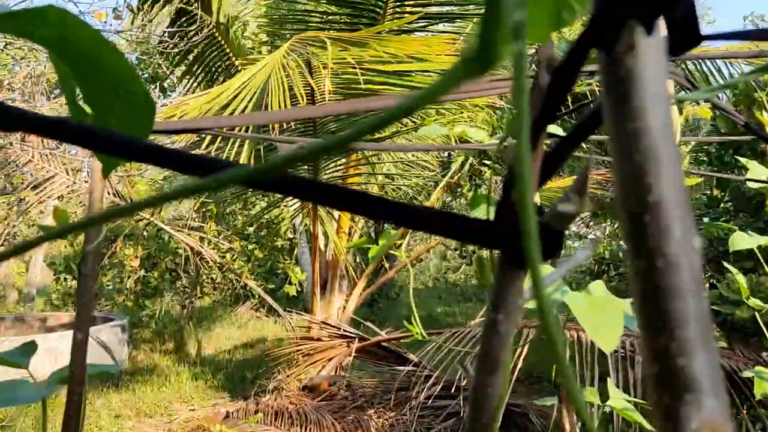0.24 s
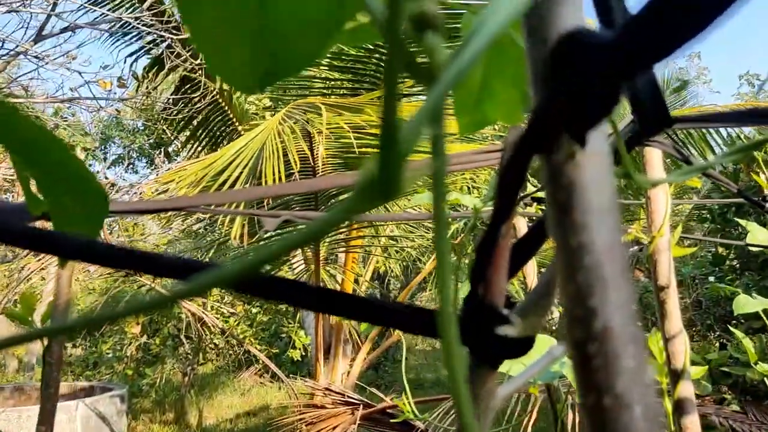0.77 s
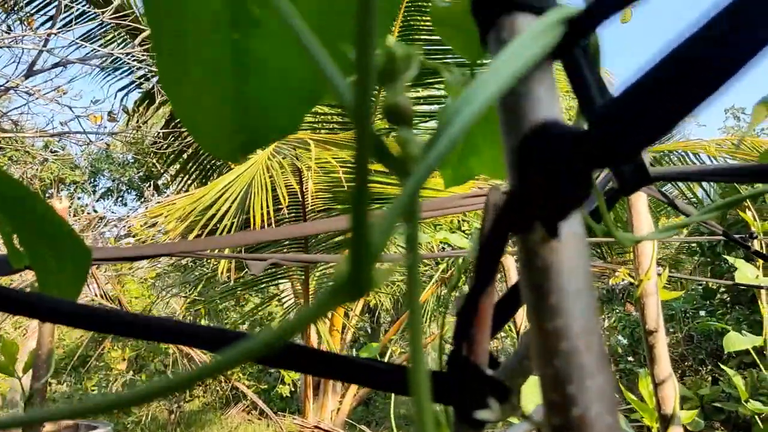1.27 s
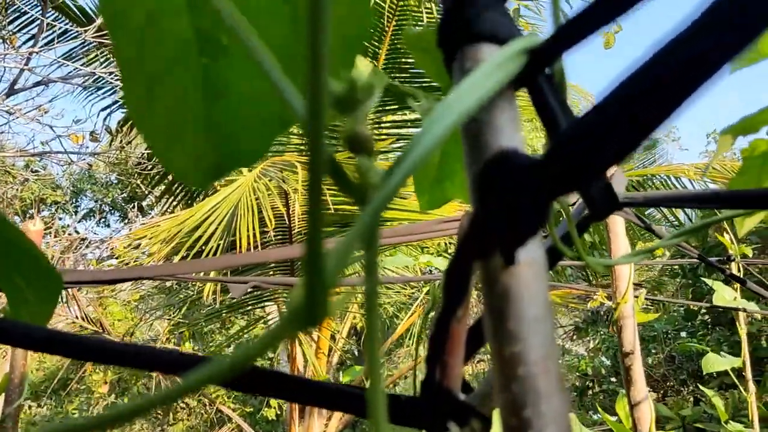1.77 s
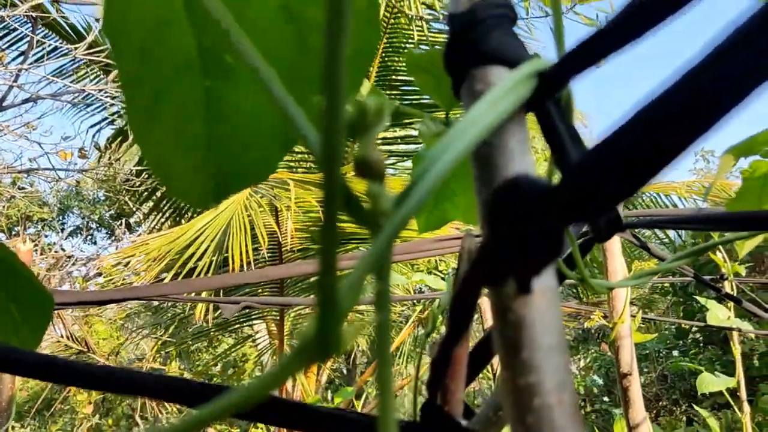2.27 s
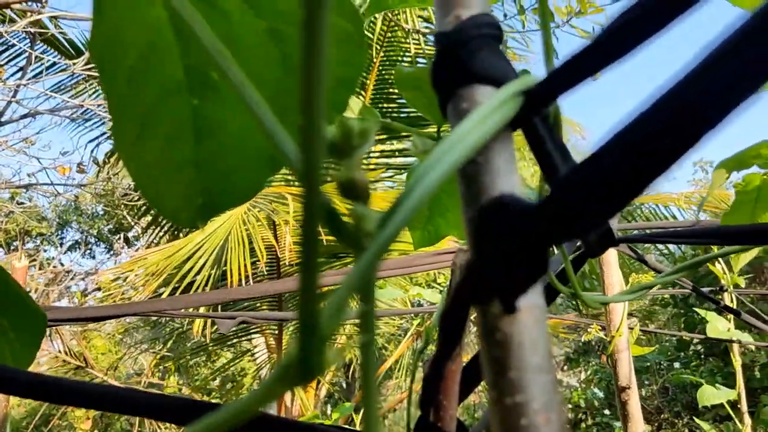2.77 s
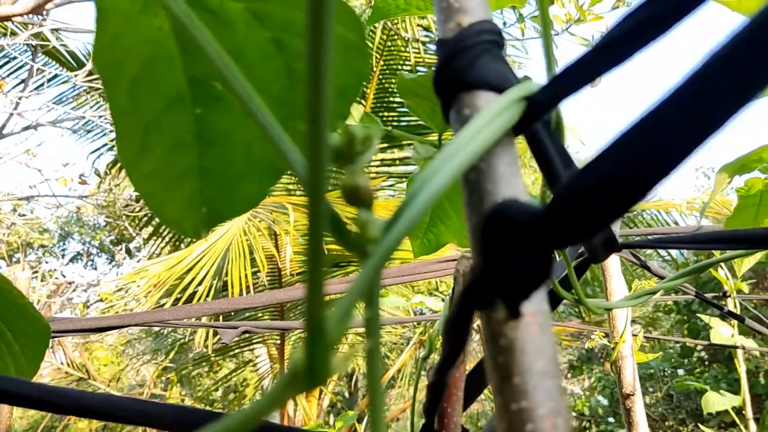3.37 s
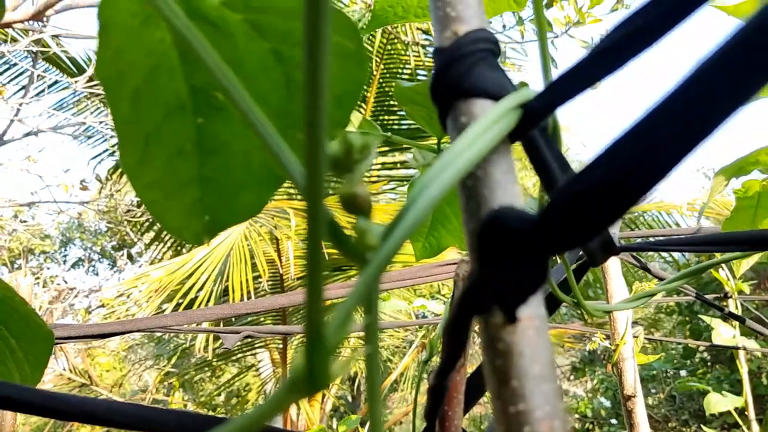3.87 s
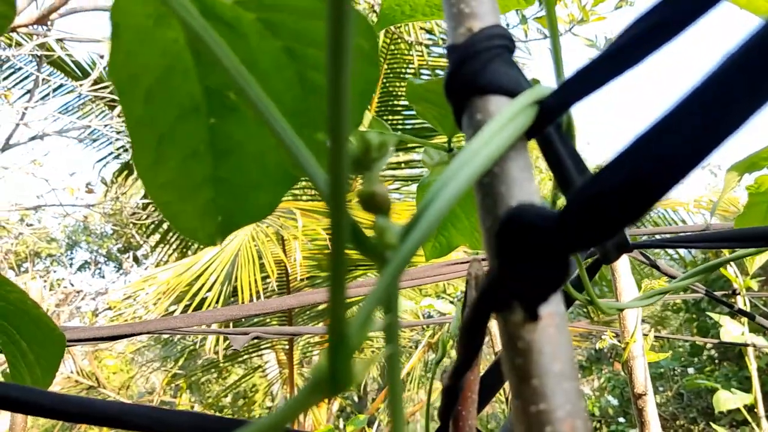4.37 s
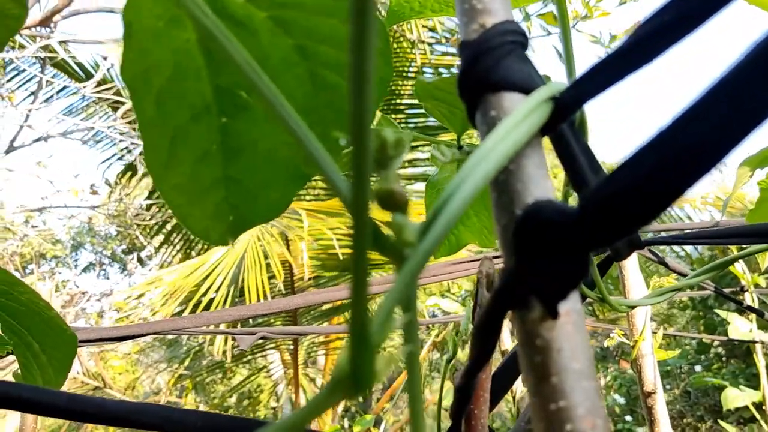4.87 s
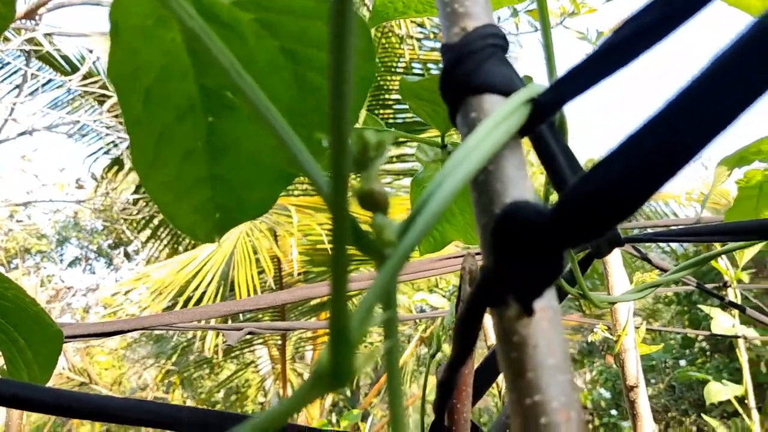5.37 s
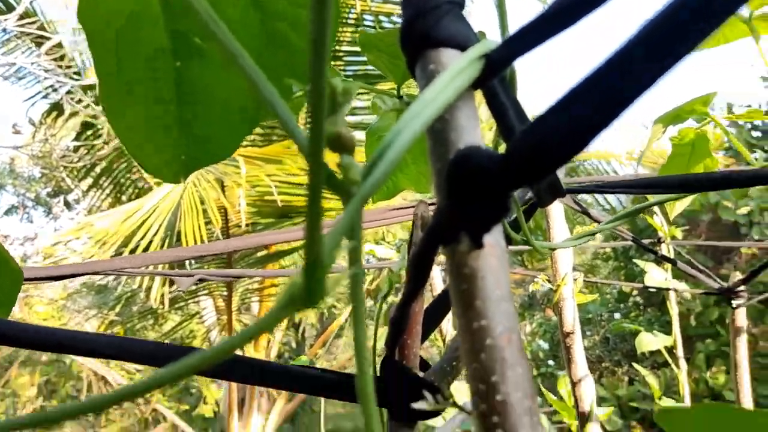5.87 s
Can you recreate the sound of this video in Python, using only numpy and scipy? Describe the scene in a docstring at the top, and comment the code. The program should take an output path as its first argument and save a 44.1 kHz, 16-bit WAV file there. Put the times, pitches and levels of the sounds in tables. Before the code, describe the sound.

A shrill cicada drone, strongest on the right, runs throughout in a tropical garden, with two crickets chirping rapidly out of step. A leaf brushes the microphone at the start, and one sharp tick comes on the left before halfway. Birds whistle and rasp softly, then cluck more busily near the end. Underneath, a breeze rumbles on the hand-held microphone and a faint, far engine throbs and fades.

```python
"""A shrill cicada drone, strongest on the right, fills a tropical garden by day; the phone is hand-held.
Two kinds of cicada, high and low, buckle their tymbals and ring their abdomens, while two crickets
stroke their wings out of step. Birds cluck, whistle and rasp nearby; a far one repeats a phrase.
Far off, a slow engine throbs and draws away over the hum of the place. Right at the microphone,
a breeze rumbles on the two ports, a leaf brushes by and there is one sharp tick."""
import sys
import numpy as np
from scipy import signal
from scipy.io import wavfile
from scipy.ndimage import uniform_filter1d

SR = 44100
rng = np.random.default_rng(int(sys.argv[2]) if len(sys.argv) > 2 else 0)


def to_wav(s):
    """Save 16-bit WAV."""
    ch = np.atleast_2d(s).T  # columns
    pcm = np.round(np.clip(ch, -1, 1) * 32767)  # PCM
    wavfile.write(sys.argv[1], SR, pcm.astype(np.int16))


N = 270171
T = np.arange(N) / SR
PORT_LAG = int(.00042 * SR)  # samples by which sound from the right is late at the left port

# Distant hum of the garden. Each row: frequency in Hz, relative spectral density in dB.
HUM_SPECTRUM = [(35, -35), (60, 1.5), (92, -9), (129, -11), (360, -19), (680, -17.5), (1170, -25.5),
                (1930, -22), (2560, -27.5), (3600, -25.5), (5200, -30), (6760, -54), (11400, -120)]
# Far engine drawing away. Each row: time in seconds, firing rate in Hz, level in dB.
ENGINE_RUN = [(0, 18.1, -41.5), (0.702, 19.6, -44), (2.1, 20.6, -45), (3.4, 21.1, -52), (4.2, 21, -52),
              (6.13, 20.5, -56)]
# Resonances of its exhaust. Each row: centre in Hz, width in Hz, relative gain in dB.
EXHAUST_MODES = [(95.1, 32.3, 8.5), (85.5, 11, 6.5), (143.7, 27, -1)]
# Far whine, sinking twice. Each row: start and length in seconds, first and last pitch in Hz, level in dB.
WHINE_GLIDES = [(1.82, .66, 975, 805, -60), (2.46, .62, 890, 730, -60.5)]
# The far bird's phrase. Each row: delay and length of a note in seconds, its first, middle and last
# pitch in Hz, dB above the phrase's level.
PHRASE_NOTES = [(0, 0.035, 3250, 4150, 4770, 13.5), (0, .035, 3800, 3900, 3700, 13.5),
                (0.044, 0.0305, 3700, 3900, 3550, 3.5), (0.072, 0.017, 4800, 4300, 5000, 13.5),
                (.07, 0.044, 3800, 3700, 3900, 11), (.065, 0.018, 3500, 3100, 3450, 5)]
# Repeats of that phrase. Each row: start in seconds, level in dB.
PHRASE_REPEATS = [(.745, -62.5), (1.066, -63), (1.39, -61), (1.72, -61.5), (2.049, -61), (2.368, -64),
                  (2.712, -60), (3.045, -58.5), (3.36, -66.5), (3.645, -63), (3.96, -65), (5.45, -62.5),
                  (6.04, -62)]
# Near whistles and faint low hoots. Each row: start and length in seconds, first and last pitch in Hz,
# level in dB.
BIRD_WHISTLES = [(0.369, 0.075, 2433, 1744, -44), (1.125, 0.021, 5900, 4630, -44),
                 (1.774, .012, 5070, 4470, -48), (2.144, 0.089, 2100, 1820, -57),
                 (2.476, 0.034, 2100, 1840, -54), (2.76, 0.047, 2100, 1880, -56),
                 (2.954, 0.1, 2200, 2570, -57), (3.083, 0.056, 2085, 1880, -59),
                 (3.414, 0.052, 2085, 1890, -54), (3.68, 0.081, 2100, 1846, -53),
                 (5.622, .045, 3120, 3100, -38.5), (5.9, 0.046, 2900, 3130, -40),
                 (5.94, 0.023, 3150, 3140, -34)]
BIRD_HOOTS = [(5.834, 0.083, 585, 626, -51.5), (5.939, 0.073, 762, 760, -48), (5.979, 0.062, 226, 225, -47),
              (6.091, 0.037, 250, 290, -45)]
# Near clucks. Each row: start and length in seconds, top pitch in Hz, level in dB.
BIRD_CLUCKS = [(4.208, 0.036, 2010, -46.5), (5.447, 0.025, 2012, -42.5), (5.463, 0.021, 1920, -42),
               (5.445, 0.037, 2500, -45), (5.588, 0.019, 1827, -35.5), (5.61, 0.018, 1880, -48),
               (5.665, 0.042, 1990, -34.5), (5.7, 0.03, 2350, -47), (5.674, 0.03, 2500, -41),
               (5.708, 0.034, 2020, -55), (5.785, 0.02, 1776, -35.5), (5.788, 0.0364, 1392, -37),
               (5.819, 0.03, 1790, -48), (5.817, 0.031, 2530, -44), (5.884, 0.026, 1710, -44),
               (6.074, 0.032, 1904, -40), (6.097, 0.03, 2524, -35)]
# Near hoarse calls. Each row: start and length in seconds, throat resonance and width in Hz, level in dB.
BIRD_RASPS = [(0.43, 0.067, 4660, 700, -55.5), (0.688, 0.14, 4870, 600, -55.5),
              (0.985, 0.088, 4830, 400, -52), (1.177, 0.074, 4560, 350, -55),
              (1.282, 0.12, 4540, 800, -54.5), (2.41, 0.074, 3740, 1200, -47.5),
              (5.038, 0.064, 3640, 1000, -49), (5.245, 0.13, 1770, 500, -50),
              (5.445, 0.067, 3700, 500, -46), (5.6, 0.11, 2560, 540, -49.5), (5.616, 0.13, 3030, 298, -47),
              (5.75, 0.11, 3090, 300, -62), (5.72, 0.057, 4480, 700, -54), (6.03, 0.1, 4300, 900, -60),
              (5.89, 0.12, 3020, 394, -44), (6.009, 0.069, 3090, 310, -48)]
# Each cricket's loudness, direct to the right port. Each row: time in seconds, level in dB.
FAR_CRICKET_LEVELS = [(.2, -42), (.9, -42), (1.2, -37.5), (2.2, -36), (3.4, -37.5), (4.6, -36),
                      (5.1, -37.5), (5.8, -37)]
NEAR_CRICKET_LEVELS = [(0, -32.5), (.8, -34.5), (1.5, -35.5), (2.1, -31.5), (2.9, -32), (3.3, -37),
                       (4, -30.5), (4.9, -35), (5.8, -30)]
# Single cicadas. Each row: bursts per second at the start and at the end, throb rate in Hz,
# throb depth from 0 to 1, left and right level in dB.
LOW_CICADAS = [(139, 139, 60, .95, -41, -37), (118, 118, 7, .1, -47, -42)]
HIGH_CICADAS = [(120.1, 120, 3.5, 0, -37, -31.5), (97.4, 91, 13, 0, -58, -34),
                (112, 65, 13, 0.05, -52, -34)]
# Abdomen resonances, one list as heard at the left port, one at the right.
# Each row: centre in Hz, width in Hz, relative gain in dB.
LOW_ABDOMEN = [
    [(6396, 880, 2), (5615, 610, -11), (6120, 280, -2), (11600, 1300, -21.5), (12970, 500, -8.5)],
    [(6427, 940, 4.5), (5660, 310, -13), (13070, 750, -16.5), (13700, 400, -25)],
]
HIGH_ABDOMEN = [
    [(8980, 1430, 2), (10060, 820, 4.5), (11025, 200, -5.5)],
    [(8760, 990, -1), (9348, 640, 0), (9870, 670, -13)],
]
# Swell of the chorus, used about its mean. Each row: time in seconds, high kind in dB, low kind in dB.
CHORUS_SWELL = [(0.0, -34, -45.5), (0.1, -34, -45), (1.17, -34, -47), (2.52, -35, -45.5), (2.87, -34, -46),
                (3.79, -35, -46.5), (3.93, -33.5, -45), (5.972, -34, -46), (6.0, -34, -46)]
# Brief dips of the high drone on the right. Each row: time in seconds, level change in dB.
DRONE_DIPS = [(0.138, -22), (0.86, -9), (1.267, -5), (1.73, -6), (2.035, -15), (2.162, -23), (2.694, -24),
              (3.466, -13.5), (3.66, -10), (3.807, -13), (4.233, -14), (5.513, -8), (5.727, -13)]


def undb(db):
    """Decibels to gain."""
    return 10 ** (np.asarray(db) / 20)


def level(x, db):
    """Scale to an rms level."""
    return x * undb(db) / np.sqrt(np.mean(x ** 2))


def ring(x, hz, width, order=2):
    """A steep resonance: a two-pole band-pass run several times."""
    b, a = signal.iirpeak(hz, hz / width, fs=SR)
    for _ in range(order):
        x = signal.lfilter(b, a, x)
    return x


def walk(rate):
    """A smooth wander: random values held 1 / rate seconds and slewed twice."""
    hold = int(SR / rate)
    steps = np.repeat(rng.standard_normal(N // hold + 1), hold)
    return 2.2 * uniform_filter1d(uniform_filter1d(steps, hold), hold)[:N]


def clicks(rate, jitter_s, scatter_db):
    """One click per cycle, each a little early or late and of its own size."""
    cycles = np.flatnonzero(np.diff(np.floor(np.cumsum(rate) / SR)))
    timing, size = rng.standard_normal((N // 40, 2))[:len(cycles)].T
    onsets = np.clip(cycles + (jitter_s * SR * timing).astype(int), 0, N - 1)
    out = np.zeros(N)
    np.add.at(out, onsets, undb(scatter_db * size))
    return out


def window(start, length, edge):
    """A gate with rounded ends."""
    return np.sin(np.pi / 2 * np.clip(np.minimum(T - start, start + length - T) / edge, 0, 1)) ** 2


def foliage(x, t60, wet_db):
    """Direct sound plus a spray of echoes off leaves and trunks, new each time."""
    t = T[:int(SR * .5)]
    response = level(rng.standard_normal(len(t)) * np.exp(-np.log(1000) * t / t60), wet_db)
    response /= np.sqrt(len(t))
    response[:int(.01 * SR)] = 0  # gap before the first echo
    response[0] = 1
    return signal.fftconvolve(x, response)[:N]


def garden_hum():
    """Distant hum in third-octave bands that each flicker; only the bass is alike at both ports."""
    out = 0
    spectrum_hz, spectrum_db = np.transpose(HUM_SPECTRUM)
    for hz in 60 * 2 ** np.arange(0, 6.5, 1 / 3):
        mid, side = (ring(rng.standard_normal(N), hz, hz / 2.93) for _ in range(2))
        band = mid + min(hz / 300, 1) * side * np.array([[1], [-1]])
        band_db = np.interp(np.log(hz), np.log(spectrum_hz), spectrum_db)
        flicker_db = .5 * walk(4) + 1.5 * min(hz / 3000, 1) * walk(40)
        out = out + undb(band_db + flicker_db) * band
    return level(out, -47.5)


def engine():
    """Far off, slow uneven firings ring an exhaust, smeared by echoes on the long way here."""
    times, firing_hz, db = np.transpose(ENGINE_RUN)
    firings = clicks(np.interp(T, times, firing_hz), jitter_s=.0009, scatter_db=1.8)
    exhaust = sum(undb(gain_db) * ring(firings, hz, width) for hz, width, gain_db in EXHAUST_MODES)
    ports = np.array([foliage(exhaust, t60=.35, wet_db=-8.5) for _ in range(2)])
    return level(ports, 0) * undb(np.interp(T, times, db))


def whine(fade_db_per_s=4):
    """A faint, far tone wavers and fades as it sinks in pitch."""
    waver, flicker_db = 1 + .009 * walk(50), 2 * walk(15)
    out = 0
    for start, length, first_hz, last_hz, db in WHINE_GLIDES:
        hz = np.interp(T, [start, start + length], [first_hz, last_hz]) * waver
        envelope = window(start, length, .08) * undb(db + flicker_db - fade_db_per_s * (T - start))
        out = out + envelope * np.sin(2 * np.pi * np.cumsum(hz) / SR)
    return out


def breeze():
    """Air on the microphone: a separate deep rumble at each port, swelling in the same gusts."""
    air = rng.standard_normal((2, N))
    air = signal.sosfilt(signal.butter(1, [3, 9], "band", fs=SR, output="sos"), air)
    air = signal.sosfilt(signal.butter(2, 70, fs=SR, output="sos"), air)
    return level(air * undb(3.05 * walk(2.7)), -38.5)


def leaf_brush():
    """A leaf brushes by at the start: gritty noise, brighter on the left."""
    grit = rng.standard_normal((2, N)) * undb(1.2 * walk(500))
    body = sum(level(ring(grit, hz, width), db)
               for hz, width, db in [(640, 1300, -46), (1540, 2060, -33.5), (3200, 2000, -44)])
    hiss = level(ring(grit, 9800, 2200), -32) * undb([[0], [-6]])
    top = level(ring(grit, 10600, 1100, order=3), -49)
    return (body + hiss + top) * window(start=.068, length=.11, edge=.05)


def tick(start=2.481, t60=.047):
    """One sharp tick close to the left port: bright noise that dies fast."""
    age = np.maximum(T - start, 0)
    burst = (T >= start) * np.exp(-np.log(1000) * age / t60) * rng.standard_normal(N)
    bright = ring(burst, 11300, 2500) + undb(-12) * ring(burst, 13000, 2500)
    return bright / np.abs(bright).max() * undb([[-13], [-28]])


def bird_notes(notes, breath, wobble, breathiness):
    """Tones that curve through three pitches; the breathier the throat, the worse it holds its pitch."""
    out = np.zeros(N)
    for start, length, *pitches, db in notes:
        span = slice(int(start * SR), int((start + length) * SR))
        hz = np.polyval(np.polyfit([0, .5, 1], pitches, deg=2), (T[span] - start) / length)
        hz *= 1 + .022 * breathiness * wobble[span]
        voice = (1 - breathiness + breathiness * breath[span]) * np.sin(2 * np.pi * np.cumsum(hz) / SR)
        out[span] += undb(db) * np.sqrt(2 * np.hanning(len(hz))) * voice
    return out


def bird_rasps(pulse_hz=300):
    """Hoarse calls nearby: quick uneven pulses ring a throat."""
    out = np.zeros(N)
    for start, length, hz, width, db in BIRD_RASPS:
        pulses = clicks(np.full(N, pulse_hz), jitter_s=.0012, scatter_db=2)
        out += window(start, length, .012) * level(ring(pulses, hz, width, order=3), db)
    return out


def birds():
    """Birds in the leaves to the right: calls close by, and a far phrase with more echo."""
    breath = level(ring(rng.standard_normal(N), 220, 710), 0)
    wobble = walk(400)
    # no two phrases are sung alike
    tuning = 1 + .0201 * rng.standard_normal((len(PHRASE_REPEATS), len(PHRASE_NOTES)))
    phrases = [(start + delay, length, *(np.array(pitches) * tuning[j, k]), db + note_db)
               for j, (start, db) in enumerate(PHRASE_REPEATS)
               for k, (delay, length, *pitches, note_db) in enumerate(PHRASE_NOTES)]
    # whistles and hoots glide faster towards the end; clucks arch up and fall back
    glides = [(start, length, first, first + .33 * (last - first), last, db)
              for start, length, first, last, db in BIRD_WHISTLES + BIRD_HOOTS]
    clucks = [(start, length, .7 * top, top, .7 * top, db) for start, length, top, db in BIRD_CLUCKS]
    far = bird_notes(phrases, breath, wobble, breathiness=.4)
    near = bird_notes(glides, breath, wobble, breathiness=.28)
    near += bird_notes(clucks, breath, wobble, breathiness=.42) + bird_rasps()
    return np.array([np.roll(foliage(near, t60=.25, wet_db=-2) + foliage(far, t60=.25, wet_db=1), lag)
                     for lag in (PORT_LAG, 0)])


def cricket(times, levels_db, hz, droop_hz, length, left_db):
    """Each wing stroke is a pure tone whose pitch droops at both ends, echoed by the leaves."""
    t = T[:int(length * SR)]
    pitch = hz - droop_hz * np.abs(2 * t / length - 1) ** 2.2
    stroke = np.hanning(len(t)) ** .3 * np.sin(2 * np.pi * np.cumsum(pitch) / SR)
    tone = np.zeros(N)
    for centre, db in zip(times, levels_db):
        onset = int((centre - length / 2) * SR)
        tone[onset:onset + len(t)] += np.sqrt(2) * undb(db) * stroke
    tone *= undb(.59 * walk(150))  # the file of the wing is uneven
    # the left port faces away: it hears the chirp late and twice
    left = np.roll(tone, int(.006 * SR)) + .7 * np.roll(tone, int(.03 * SR))
    return np.array([undb(left_db) * foliage(left, t60=.25, wet_db=-5),
                     foliage(tone, t60=.15, wet_db=-8)])


def cicadas(singers, abdomen, swell_db, burst_s, echo_fill, click_db, flicker_db):
    """Each tymbal buckle, a click and a burst of rib noise, rings the abdomen; echoes fill the gaps."""
    out = np.zeros((2, N))
    burst = np.hanning(int(burst_s * SR))
    shared = .15  # share of the rib noise power that both ports hear alike
    for first_rate, last_rate, throb_hz, throb_depth, *port_db in singers:
        rate = np.linspace(first_rate, last_rate, N) * (1 + .0018 * walk(3))
        buckles = clicks(rate, jitter_s=.00002, scatter_db=.87)
        buckles *= 1 + throb_depth * np.cos(2 * np.pi * throb_hz * T)
        rib_power = level(np.convolve(buckles, burst)[:N], 0) + echo_fill
        common = rng.standard_normal(N)
        for port, lag in enumerate((PORT_LAG, 0)):
            noise = np.sqrt(shared) * common + np.sqrt(1 - shared) * rng.standard_normal(N)
            tymbal = np.roll(level(np.sqrt(rib_power) * noise, 0) + level(buckles, click_db), lag)
            # each resonance of the drone flickers slightly in level on its own
            song = sum((-1) ** k * undb(db + flicker_db * walk(14)) * ring(tymbal, hz, width, order=3)
                       for k, (hz, width, db) in enumerate(abdomen[port]))
            out[port] += level(song, port_db[port])
    return out * undb(swell_db)


def cicada_chorus(turn_db_per_s=.5):
    """Both kinds swell and ebb; the phone turns slowly, so the high drone leans further right."""
    times, *swells = np.transpose(CHORUS_SWELL)
    high_db, low_db = (np.interp(T, times, db - np.mean(db)) for db in swells)
    dips_db = sum(db * np.exp(-((T - at) / .007) ** 2) for at, db in DRONE_DIPS)
    high_db = np.array([high_db - turn_db_per_s * (T - T.mean()), high_db + dips_db])
    high = cicadas(HIGH_CICADAS, HIGH_ABDOMEN, high_db,
                   burst_s=.0035, echo_fill=1, click_db=-19.5, flicker_db=.54)
    low = cicadas(LOW_CICADAS, LOW_ABDOMEN, low_db,
                  burst_s=.0065, echo_fill=.4, click_db=-10, flicker_db=1)
    return high + low


def scene():
    """The garden as it reaches the phone's left and right ports."""
    near_chirps_s = .04 + .10545 * np.arange(56)
    far_chirps_s = .204 + .10627 * np.arange(54)  # a touch slower, so the crickets drift out of step
    near_db = np.interp(near_chirps_s, *np.transpose(NEAR_CRICKET_LEVELS))
    near_db += .6 * rng.standard_normal(len(near_db))
    far_db = np.interp(far_chirps_s, *np.transpose(FAR_CRICKET_LEVELS))
    insects = (cicada_chorus()
               + cricket(near_chirps_s, near_db, hz=7330, droop_hz=190, length=.04, left_db=-10)
               + cricket(far_chirps_s, far_db, hz=6975, droop_hz=118, length=.042, left_db=-5))
    return insects + birds() + engine() + whine() + garden_hum() + breeze() + leaf_brush() + tick()


def record(dry):
    """The phone cuts the top steeply above 14.2 kHz."""
    return signal.sosfilt(signal.ellip(8, .2, 70, 14200, fs=SR, output="sos"), dry)


dry = scene()
out = record(dry)
to_wav(out)
```